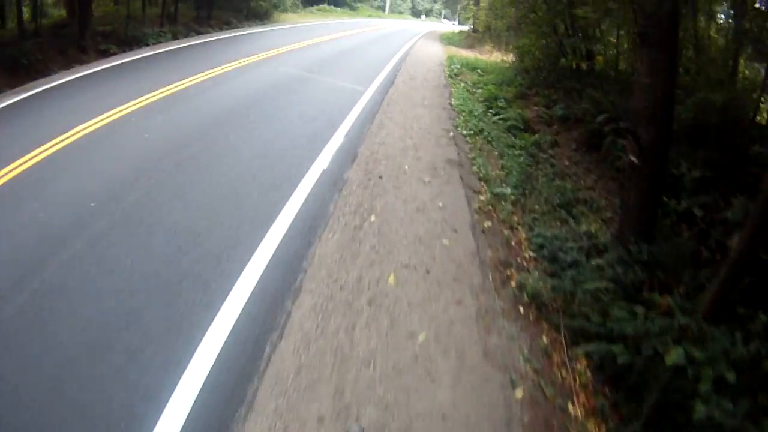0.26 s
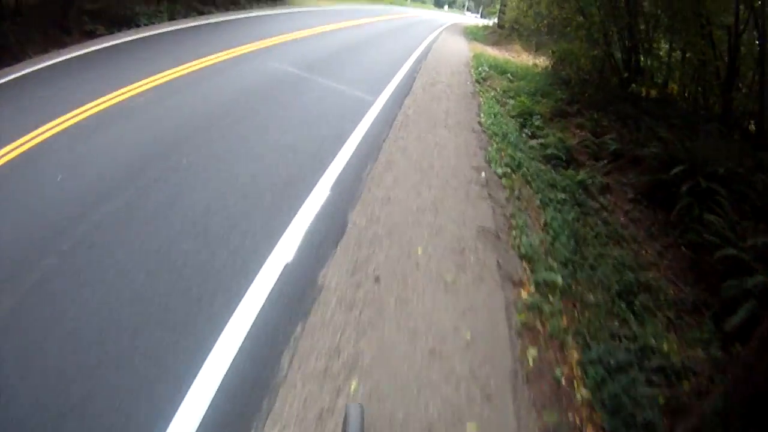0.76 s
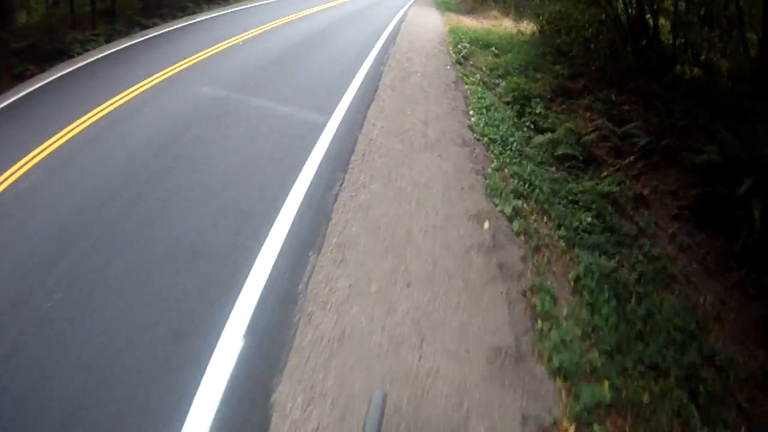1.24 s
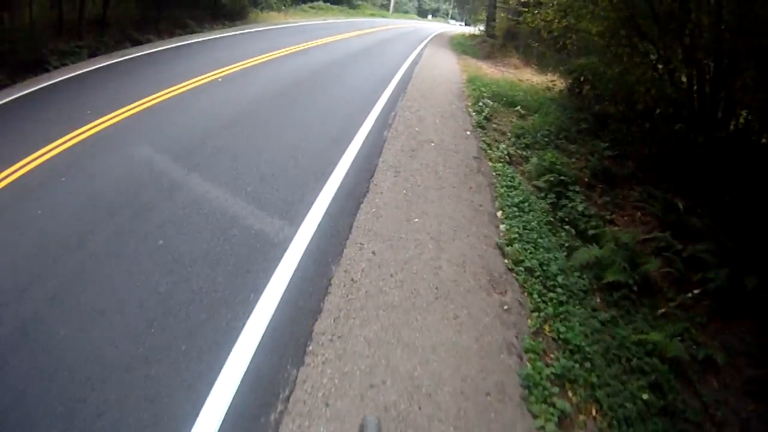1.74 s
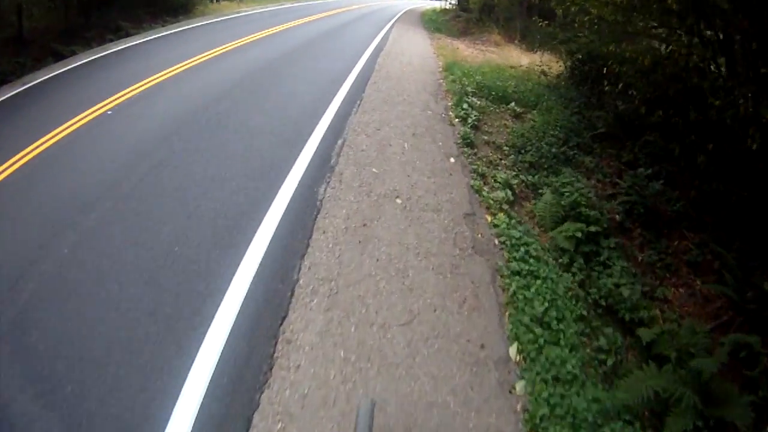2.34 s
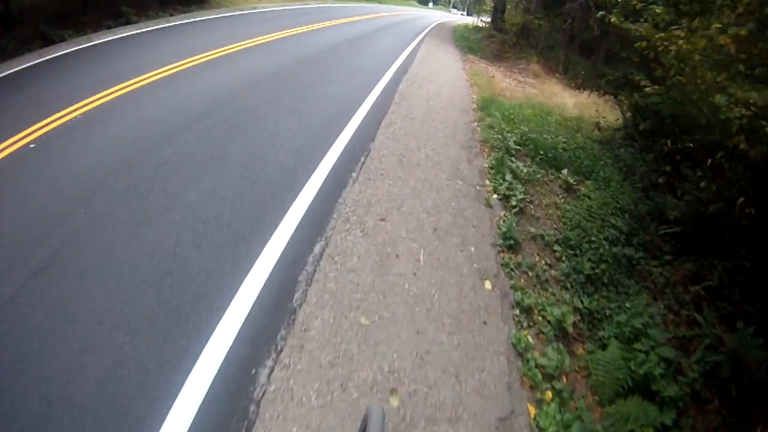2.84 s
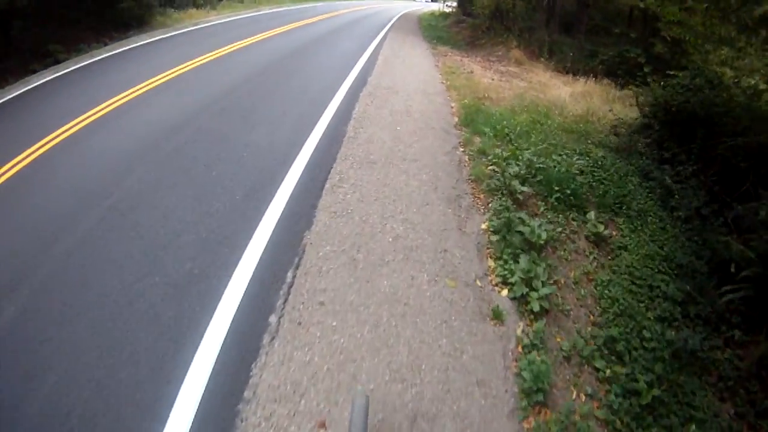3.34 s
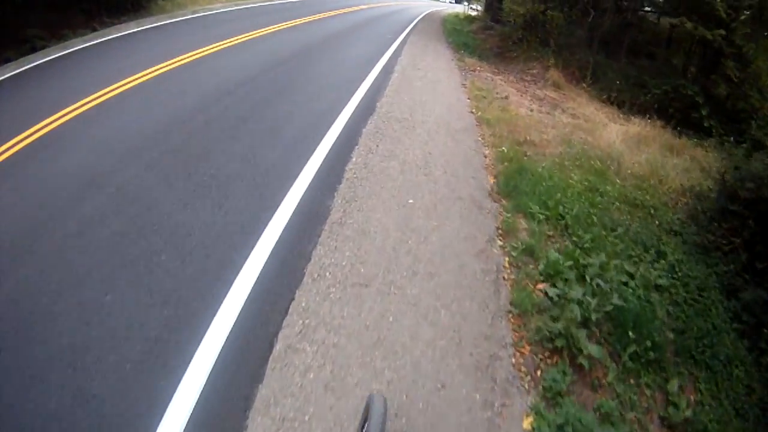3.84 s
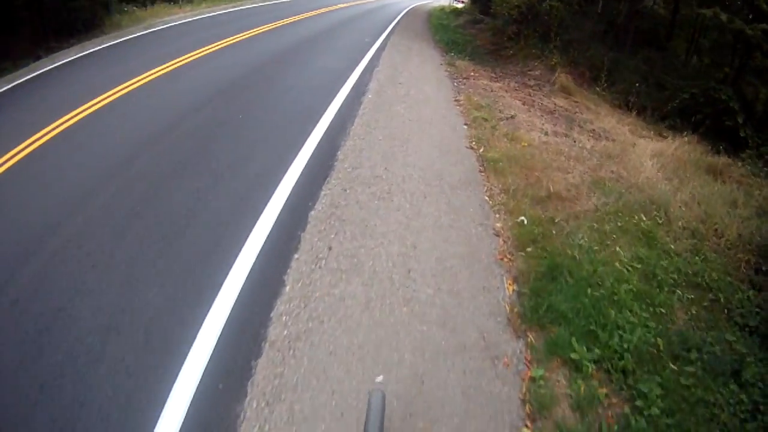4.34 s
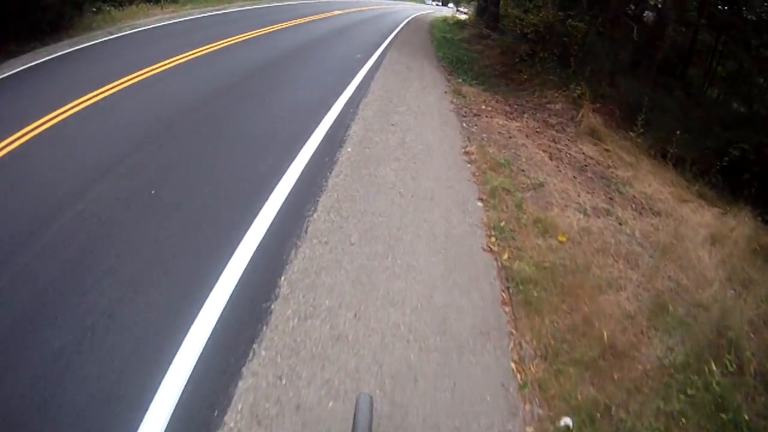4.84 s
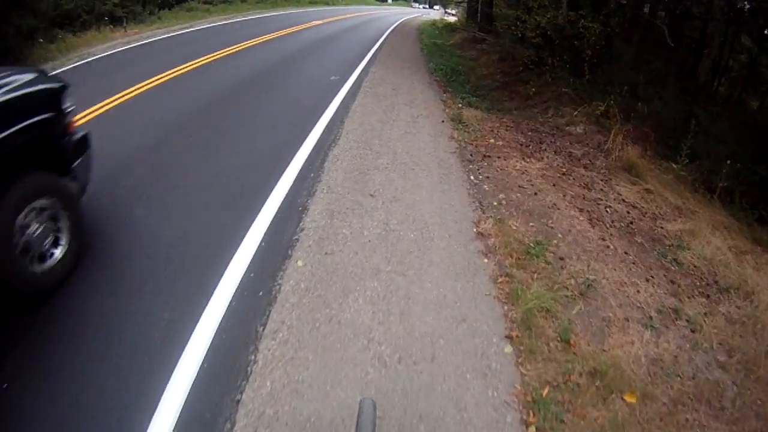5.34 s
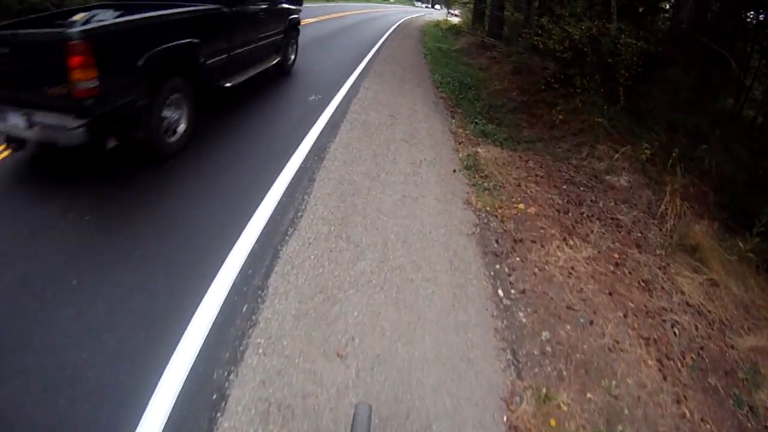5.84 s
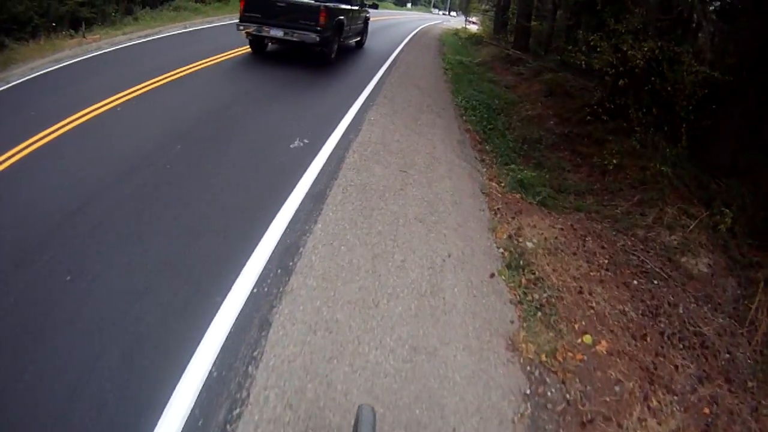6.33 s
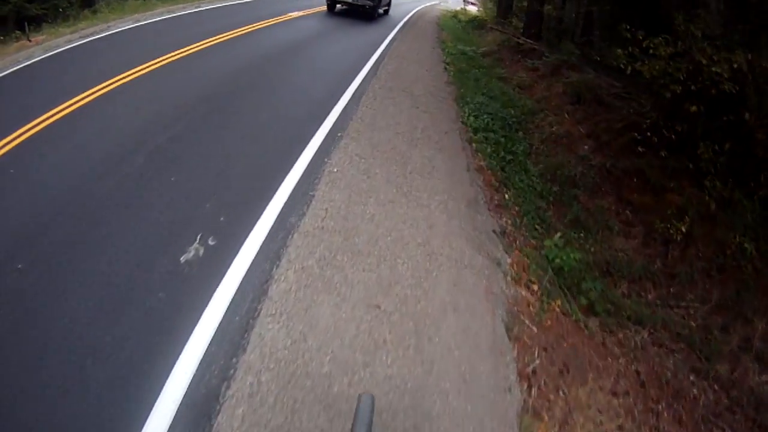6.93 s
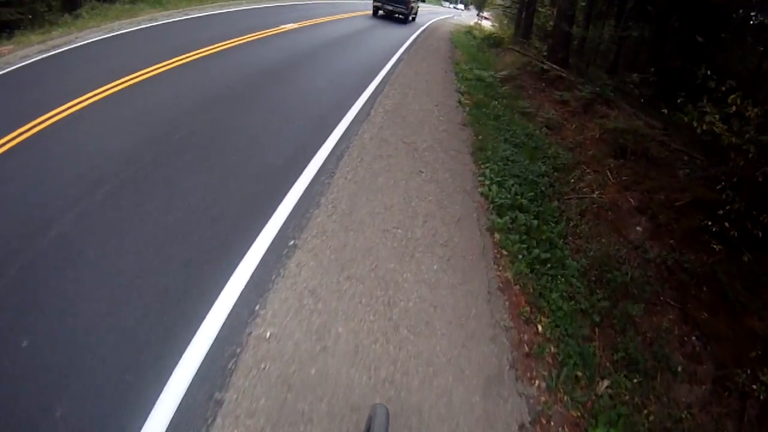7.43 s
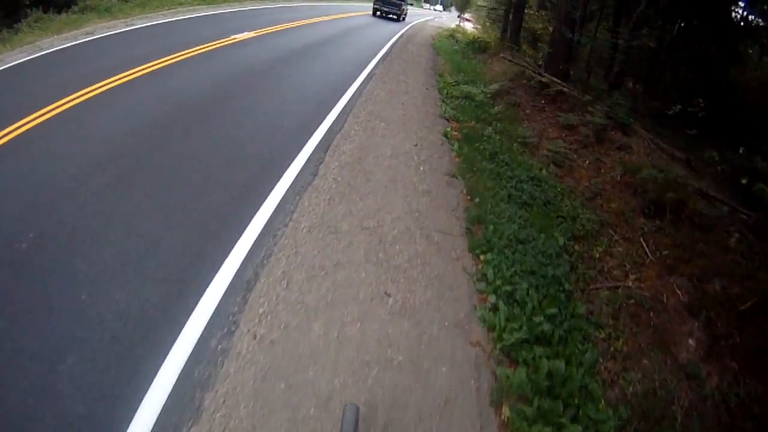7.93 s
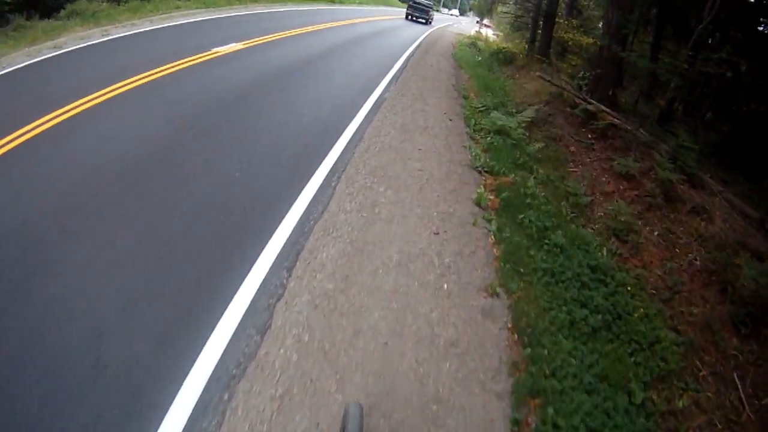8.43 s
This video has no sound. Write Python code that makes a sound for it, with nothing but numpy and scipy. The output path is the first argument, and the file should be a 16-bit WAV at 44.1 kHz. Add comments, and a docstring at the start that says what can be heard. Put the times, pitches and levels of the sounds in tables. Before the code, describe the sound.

Heard from a microphone on a moving bicycle, low gusts of wind thump over the fine crunch of tyres on roadside grit and an occasional small stone ping. A pickup truck approaches from behind and overtakes closely just past the middle, its tyres roaring and hissing and its exhaust booming. The engine drones off down the road, and the crunching and gusts come forward again.

```python
"""A gritty road shoulder, heard from a camera on a rolling bicycle. Close to the microphone the tyres
crunch, stones tick and the frame knocks, while air buffets the housing. A V8 pickup comes round the
bend behind, passes close by at about five seconds and drones away ahead, exhaust throbbing and
tyres roaring. The camera sits in a resonant plastic housing, turns its gain down under the loud
exhaust, and samples coarsely, which mirrors the sound into a gritty treble."""
import sys
import numpy as np
from scipy import signal
from scipy.fft import rfft, irfft, next_fast_len
from scipy.io import wavfile
from scipy.ndimage import uniform_filter1d, map_coordinates

SR = 44100
rng = np.random.default_rng(int(sys.argv[2]) if len(sys.argv) > 2 else 0)


def put_to_file(sound):
    """Save the sound as 16-bit audio at rate SR, in the file named by the first command-line argument."""
    columns = np.atleast_2d(sound).T  # one column per channel
    safe = np.clip(columns, -1, 1)
    whole_steps = np.round(safe * 32767)
    wavfile.write(sys.argv[1], SR, whole_steps.astype(np.int16))


N = 382782
TIME_S = np.arange(N) / SR


def amp(db):
    """Decibels to gain."""
    return 10 ** (np.asarray(db) / 20)


def unit(x):
    """x at rms 1."""
    return x / np.sqrt(np.mean(x ** 2) + 1e-20)


def curves(rows):
    """One value per sample for each column after the time."""
    times, *columns = np.transpose(rows)
    return [np.interp(TIME_S, times, column) for column in columns]


def during(rows, rise_s, fall_s):
    """1 while a curve lasts, fading to 0 before and after it."""
    start, end = rows[0][0], rows[-1][0]
    return np.interp(TIME_S, [start - rise_s, start, end, end + fall_s], [0, 1, 1, 0])


def swells(rows):
    """Brief bell-shaped rises in dB."""
    return sum(db * np.exp(-(2 * (TIME_S - crest_s) / length_s) ** 2) for crest_s, length_s, db in rows)


def wobble(rate):
    """A smooth random curve, rate knots a second."""
    knots = rng.standard_normal(int(N * rate / SR) + 4)
    return map_coordinates(knots, [TIME_S * rate])


def resonance(hz, centre_hz, width_hz):
    """A resonant peak of height 1."""
    return 1 / (1 + ((hz - centre_hz) / (width_hz / 2)) ** 2)


def filtered(x, response):
    """x times a response of frequency."""
    size = next_fast_len(N + SR // 2)
    return irfft(rfft(x, size) * response(np.fft.rfftfreq(size, 1 / SR)), size)[:N]


def coloured(x, spectrum):
    """x shaped by (Hz, dB) points on a log axis, at rms 1."""
    points_hz, db = np.transpose(spectrum)
    return unit(filtered(x, lambda hz: amp(np.interp(np.log(hz + 1), np.log(points_hz), db))))


def rush(spectrum, patchy_db):
    """Turbulent noise of rms 1, with patches of random gain in time and frequency."""
    bins = signal.stft(rng.standard_normal(N), nperseg=512)[2]
    patches = uniform_filter1d(rng.standard_normal(bins.shape), size=5, axis=0)
    patches = unit(uniform_filter1d(patches, size=12, axis=1))
    noise = signal.istft(bins * amp(patchy_db * patches), nperseg=512)[1][:N]
    return coloured(noise, spectrum)


def strikes(events, modes, crack, crack_hz):
    """Each blow gives a brief dull crack and rings the modes at new strengths."""
    out, t = np.zeros(N + SR), np.arange(SR // 5) / SR
    lowpass = signal.butter(4, crack_hz, fs=SR, output="sos")
    for start_s, peak_db in events:
        sizes = amp(rng.normal(0, 2, len(modes)))
        ring = sum(size * amp(db - 60 * t / t60) * np.sin(2 * np.pi * hz * rng.normal(1, 0.013) * t)
                   for size, (hz, db, t60) in zip(sizes, modes))
        snap = signal.sosfilt(lowpass, rng.standard_normal(len(t)) * amp(-60 * t / 0.008))
        hit = (ring + crack * snap) * (1 - np.exp(-t / .0005))  # the contact takes a moment to build
        out[round(start_s * SR):][:len(t)] += amp(peak_db) * hit / np.abs(hit).max()
    return out[:N]


def passing(nearest_s, cover_s, db, doubling_db, rear_db):
    """Level in dB of a drive-by: down doubling_db as the distance doubles, aimed backwards by rear_db."""
    ahead = (TIME_S - nearest_s) / cover_s  # cover_s: time to drive as far as the nearest distance
    distance = np.hypot(1, ahead)
    return db - doubling_db * np.log2(distance) + rear_db * ahead / distance


def bend_loss(half_clear_s, fade_s, depth_db):
    """The dB that the bend takes from a sound still behind it."""
    return depth_db / (1 + np.exp((TIME_S - half_clear_s) / fade_s))


def bounced(x, lag_s, gain):
    """x plus its slightly later reflection, which combs the spectrum."""
    return x + gain * map_coordinates(x, [np.arange(N) - lag_s * SR], order=1)


def traffic_drone():
    """A faint wavering hum in the background traffic."""
    # course of the hum: time_s, pitch_hz, level_db
    hum = [(6.2, 181.2, -55), (6.7, 180.8, -41), (7.2, 177, -39), (7.7, 173, -52)]
    pitch_hz, level_db = curves(hum)
    phase = 2 * np.pi * np.cumsum(pitch_hz * (1 + 0.0121 * wobble(15))) / SR
    return np.sqrt(2) * np.sin(phase) * amp(level_db + 2 * wobble(11)) * during(hum, .2, .1)


def wind(steady_db=-38.7, drift_db=0.5, flutter_db=1.2):
    """Right at the microphone, the gusty riding wind and the pickup's draught rumble on the housing."""
    # spectrum of the buffeting: frequency_hz, relative_db
    air = [(10, -13.5), (25, 0), (50, 4), (100, -1.5), (160, -9), (300, -17.5), (1000, -55)]
    # gusts that thump on the housing: crest_s, length_s, rise_db
    gusts = [(0.14, .18, 6), (0.77, .26, 6), (1.45, .1, 5), (1.8, .3, 5), (2.38, .28, 7), (2.88, .24, 10),
             (3.19, .2, 9), (3.51, .12, 9), (6.25, .2, 7), (7.35, .2, 7.5), (7.65, .22, 8.5),
             (8.02, .4, 10)]
    draught_db = passing(nearest_s=5.35, cover_s=.5, db=-27.5, doubling_db=9, rear_db=1.5)
    flow = np.hypot(amp(steady_db + swells(gusts)), amp(draught_db))
    return flow * amp(drift_db * wobble(5) + flutter_db * wobble(18)) * rush(air, patchy_db=0.96)


def bicycle_tyres(grains_per_s=700, size_spread_db=4, grain_db=-4.0, bed_db=1.5):
    """Countless grains crushed under the tyres: a dense bed with single larger ones standing out."""
    # loudness of the rolling: time_s, relative_db
    rolling = [(0.24, -46.8), (0.4, -43.8), (1.2, -44.5), (1.7, -45.3), (2.2, -43.8), (3.3, -45.2),
               (6.4, -44), (7.1, -43.5), (7.9, -47), (8.68, -50)]
    # spectrum of crushed grit: frequency_hz, relative_db
    grit = [(60, -16), (190, 4), (280, 3.5), (500, 7.5), (900, -2), (1500, -1), (2100, -2.5), (2500, -3),
            (3000, -1.5), (3500, -9.5), (4000, -20.5), (5000, -15.5), (5600, -26.5), (6000, -38.5)]
    level_db, = curves(rolling)
    crushed = rng.random(N) < grains_per_s / SR
    sizes = amp(size_spread_db * np.minimum(rng.exponential(size=N), 4)) * rng.choice([-1, 1], N)
    grains = amp(grain_db) * coloured(crushed * sizes, grit)
    bed = amp(bed_db) * rush(grit, patchy_db=1.3)
    return amp(level_db + 0.28 * wobble(25)) * (grains + bed)


def stones():
    """Stones flicked by the tyres ping off the bicycle."""
    # stone hits: start_s, relative_peak_db
    flicks = [(.969, -30), (1.24, -29), (1.5938, -17.5), (2.1984, -28), (4.5531, -18), (5.1966, -9),
              (6.9898, -28), (7.7209, -29), (7.8685, -30), (8.089, -31), (8.1484, -31), (8.3205, -31)]
    # modes of a ping: pitch_hz, relative_db, t60_s
    modes = [(1810, -7, .02), (2085, -1.5, 0.033), (2690, -4.5, 0.027), (3280, -12, .008)]
    return amp(-4.5) * strikes(flicks, modes, crack=2, crack_hz=3020)


def frame_knocks():
    """Bumps knock the frame, which rings low and briefly."""
    # bumps in the shoulder: start_s, relative_peak_db
    bumps = [(0.331, -25), (0.784, -23), (0.884, -31), (1.645, -27), (3.131, -25), (7.94, -29),
             (8.257, -29)]
    # modes of the frame: pitch_hz, relative_db, t60_s
    modes = [(363, -1, 0.15), (503, 2, 0.03), (643, -23, 0.025)]
    return amp(-6) * strikes(bumps, modes, crack=2.2, crack_hz=1200)


def scrape():
    """Something scrapes briefly on the bicycle: noise through two resonances."""
    # course of the scrape: time_s, level_db
    stroke = [(0.22, -65), (0.33, -43.5), (0.48, -44.5), (0.65, -56)]
    # resonances of the scraped part: centre_hz, width_hz, relative_db
    peaks = [(1363, 180, -5), (2130, 160, -12)]
    body = lambda hz: sum(amp(db) * resonance(hz, centre, width) for centre, width, db in peaks)
    level_db, = curves(stroke)
    return unit(filtered(rng.standard_normal(N), body)) * amp(level_db) * during(stroke, .05, .05)


def pickup_road_noise(comb_above_hz=1450):
    """The pickup's tyres roar from afar, hiss as they close in and turn dull and hollow once ahead."""
    # spectra of the tyre roar, tread noise, close hiss and dull wake: frequency_hz, relative_db
    roar_spectrum = [(30, -10), (120, 16.5), (200, 8.5), (280, 4.5), (550, 6), (850, -1), (1100, 2),
                     (1500, 2), (2300, -2), (3000, -8.5), (3600, -18), (4900, -19.5), (6000, -34)]
    tread_spectrum = [(900, -30), (1700, -6.5), (2400, -3), (2900, -0.5), (3200, -6), (3600, -17.5),
                      (4600, -17.5), (5100, -18.5), (5600, -26), (6000, -21)]
    hiss_spectrum = [(200, 9), (450, 6), (800, 5), (1700, 11.5), (3000, -1.5), (3550, -9), (4000, 14.5),
                     (4700, 1.5), (5400, 7), (6000, 2.5)]
    wake_spectrum = [(20, -17), (60, 3.5), (120, 7), (210, 6), (265, -0.5), (345, 6.5), (450, 1),
                     (650, -6.5), (900, -6.5), (1500, -11), (2200, -14.5), (3000, -27.5), (4000, -31),
                     (6000, -46)]
    # surges as each axle goes by the microphone: crest_s, length_s, rise_db
    axles = [(5.16, .26, 2.8), (5.48, .18, 2.2)]
    # one more swell as the pickup draws away: crest_s, length_s, rise_db
    late_swell = [(6.85, .9, 4)]
    # the bounce that combs the sound, lagging less with distance: time_s, lag_s, treble_gain
    bounce = [(5.2, .00143, 0), (5.45, .00142, .6), (6.7, .0014, .6), (7.2, .00138, .25),
              (8.68, .00135, .25)]
    axle_db = swells(axles)
    lag_s, treble_gain = curves(bounce)
    roar_db = passing(nearest_s=5.31, cover_s=.41, db=-23.9, doubling_db=7.2, rear_db=-4.9)
    tread_db = passing(nearest_s=5.42, cover_s=.2, db=-31.7, doubling_db=5.4, rear_db=-7.9)
    tread_db -= bend_loss(half_clear_s=3.7, fade_s=.13, depth_db=15)
    hiss_db = passing(nearest_s=5.25, cover_s=.27, db=-32.5, doubling_db=11.7, rear_db=.2)
    wake_db = passing(nearest_s=5.17, cover_s=.18, db=-23.7, doubling_db=6.2, rear_db=9.6)
    roar = amp(roar_db + axle_db + 0.3 * wobble(22)) * rush(roar_spectrum, patchy_db=1.2)
    tread = amp(tread_db + 0.34 * wobble(20)) * rush(tread_spectrum, patchy_db=1.1)
    hiss = amp(hiss_db) * coloured(rng.standard_normal(N), hiss_spectrum)
    hollow = unit(bounced(rush(wake_spectrum, patchy_db=1.73), lag_s, gain=0.3))
    wake = amp(wake_db + axle_db + 0.34 * wobble(18)) * hollow
    direct = amp(swells(late_swell)) * (roar + tread)
    treble = filtered(direct, lambda hz: hz ** 4 / (hz ** 4 + comb_above_hz ** 4))
    combed = bounced(treble, lag_s, treble_gain) / np.hypot(1, treble_gain)
    return direct - treble + combed + hiss + wake


def pickup_engine(cruise_hz=98, ease_db_per_hz=.4, far_db=-47):
    """Eight firings a cycle boom in the exhaust; their uneven spacing adds side tones that throb."""
    # engine speed: time_s, firing_hz
    speed = [(0.0, 113.8), (1.5, 101.5), (2.6, 97.2), (3.1, 92.6), (3.4, 92.3), (3.8, 96.5), (4.5, 97),
             (5.25, 101), (5.58, 105.3), (5.9, 102.3), (6.5, 101.5), (7.0, 99.5), (8.05, 98), (8.3, 94.8),
             (8.68, 93.3)]
    # tones of the two unevenly firing cylinder banks: cycle_multiple, relative_db
    orders = [(2, -39), (4, -26), (6, -24.5), (7, -37), (8, 0), (9, -30), (10, -16), (12, -25), (13, -42),
              (14, -36), (17, -30.5), (24, -44), (26, -36), (32, -33), (36, -42)]
    firing_hz, = curves(speed)
    firings = np.cumsum(firing_hz * (1 + 0.0024 * wobble(13))) / SR
    cycles = firings / 8
    tone = lambda turns: np.sqrt(2) * np.cos(2 * np.pi * turns)
    # the weak side tones waver while the firing tone holds firm
    burble = sum(amp(db) * tone(multiple * cycles) * (1 + (.03 if db > -6 else .12) * wobble(11))
                 for multiple, db in orders)
    exhaust_db = passing(nearest_s=5.26, cover_s=.53, db=-11.5, doubling_db=10.7, rear_db=12.9)
    exhaust_db -= ease_db_per_hz * np.maximum(cruise_hz - firing_hz, 0)  # softer below cruising rate
    exhaust = np.hypot(amp(exhaust_db), amp(far_db)) * burble  # the low note carries from far off
    # the engine bay hums an octave higher and is heard before the tailpipe comes into view
    bay_hum = tone(2 * firings) + amp(-6.5) * tone(10 * cycles)
    bay_db = passing(nearest_s=5.2, cover_s=.35, db=-37.3, doubling_db=2.4, rear_db=-.5)
    bay_db -= bend_loss(half_clear_s=1.5, fade_s=.3, depth_db=14)
    return exhaust + amp(bay_db + wobble(8)) * bay_hum


def gain_control(x, threshold_db=-15.4, share=.93, window_s=.16):
    """The camera removes a share of whatever its running level exceeds the threshold by."""
    power = np.abs(uniform_filter1d(x ** 2, size=int(window_s * SR)))
    excess_db = np.maximum(10 * np.log10(power + 1e-12) - threshold_db, 0)
    return x * amp(-share * excess_db)


def coarse_sampling(x, rate_hz=12000, top_hz=15300):
    """The camera holds each coarse sample four times, mirroring the spectrum into the treble."""
    coarse = signal.resample_poly(x, rate_hz, SR, window=("kaiser", 3))
    coarse += amp(-71) * rng.standard_normal(len(coarse))  # the converter's own hiss
    held = signal.resample_poly(np.repeat(coarse, 4), SR, 4 * rate_hz)[:N]
    return filtered(held, lambda hz: hz < top_hz)


def scene():
    """Bicycle, wind and traffic at one microphone riding on the bicycle."""
    bicycle = bicycle_tyres() + stones() + frame_knocks() + scrape()
    return (bicycle + wind() + pickup_engine() + pickup_road_noise() + traffic_drone())[None]


def record(dry):
    """The housing colours the sound at the microphone; the camera rides its gain and samples coarsely."""
    # resonances of the plastic housing: centre_hz, width_hz, boost_db
    peaks = [(434, 347, 3), (1108, 82, 4), (2874, 460, 7.5), (4670, 1070, 7)]
    housing = lambda hz: amp(sum(db * resonance(hz, centre, width) for centre, width, db in peaks))
    bass_cut = lambda hz: hz ** 2 / (hz ** 2 + 15 ** 2)
    heard = filtered(dry[0], lambda hz: housing(hz) * bass_cut(hz))
    return coarse_sampling(gain_control(heard))[None]


dry = scene()
out = record(dry)
put_to_file(out)
```